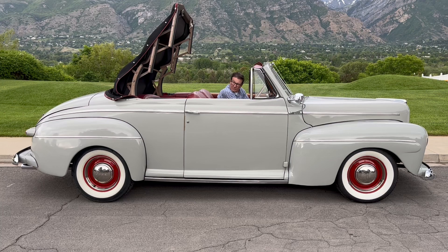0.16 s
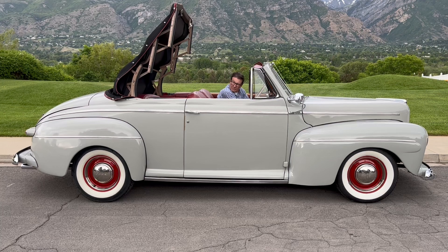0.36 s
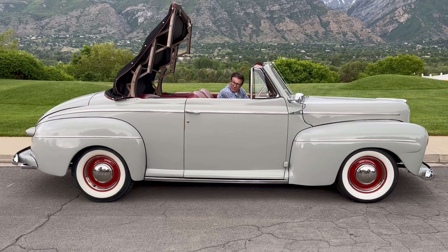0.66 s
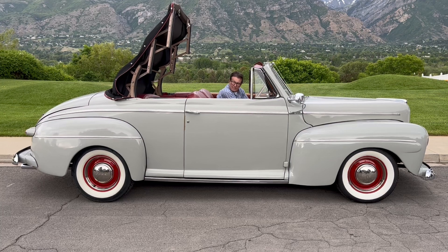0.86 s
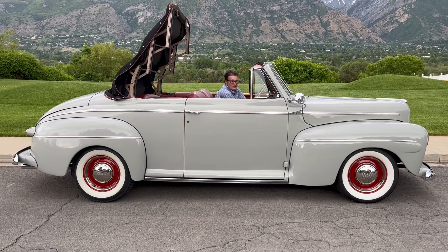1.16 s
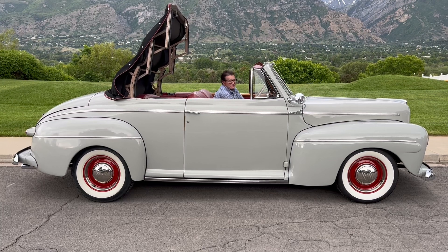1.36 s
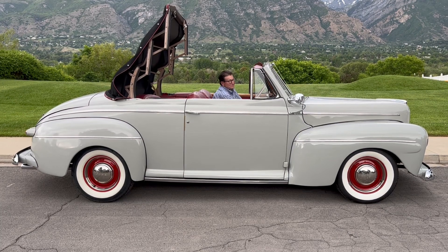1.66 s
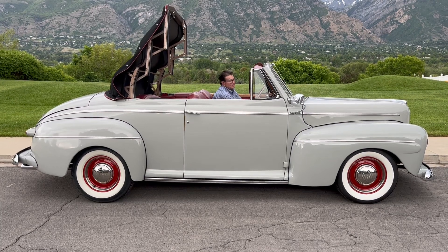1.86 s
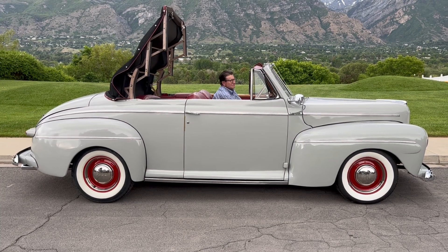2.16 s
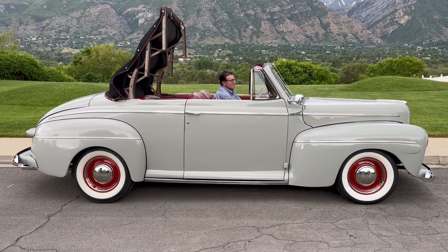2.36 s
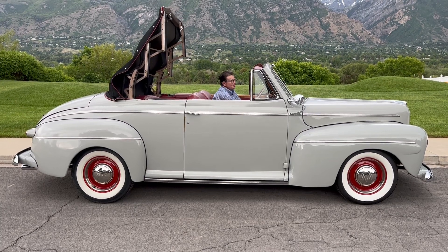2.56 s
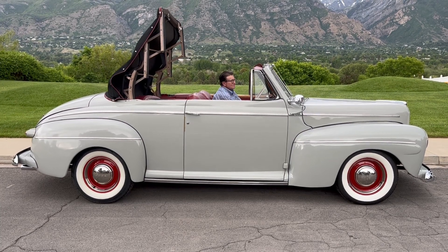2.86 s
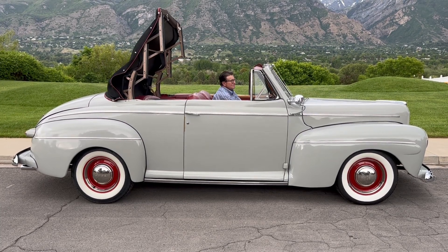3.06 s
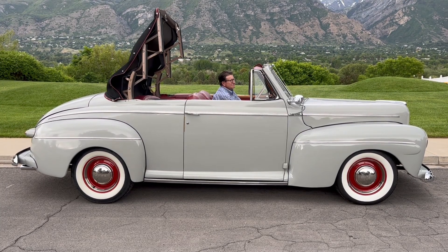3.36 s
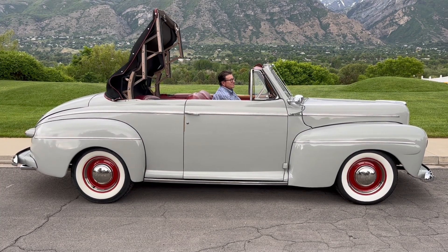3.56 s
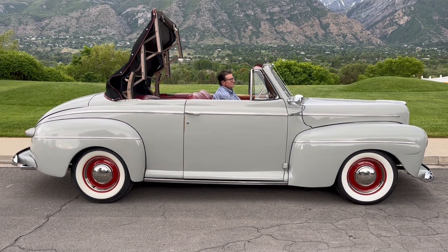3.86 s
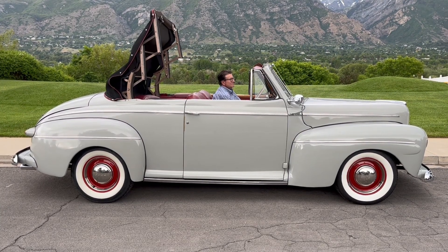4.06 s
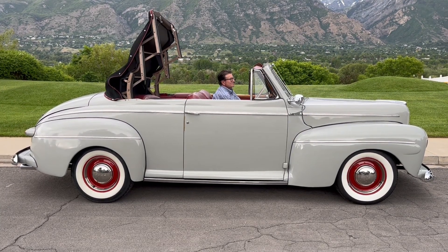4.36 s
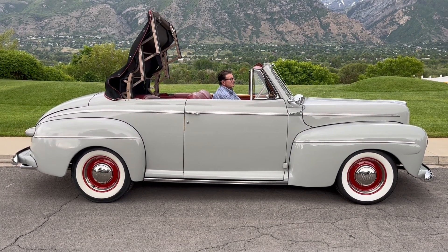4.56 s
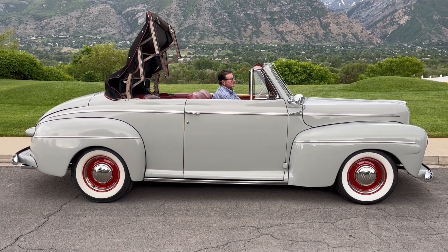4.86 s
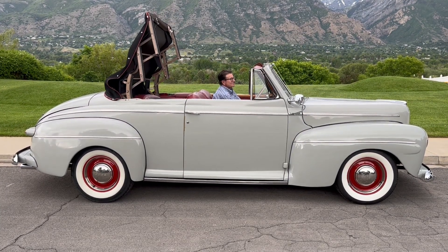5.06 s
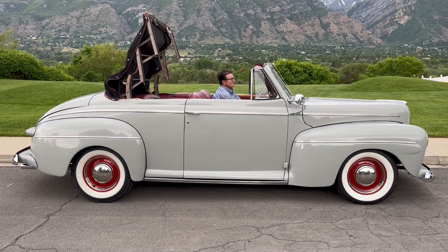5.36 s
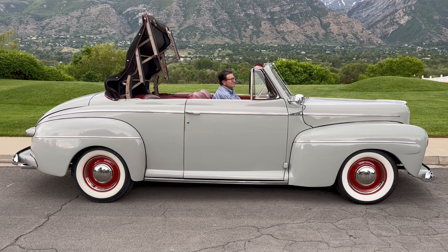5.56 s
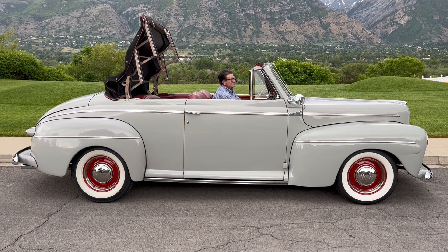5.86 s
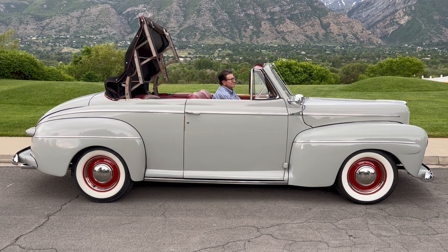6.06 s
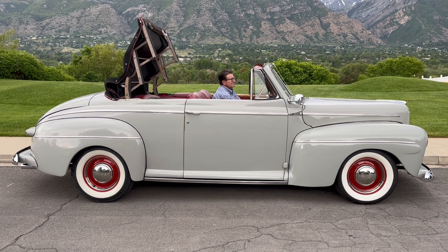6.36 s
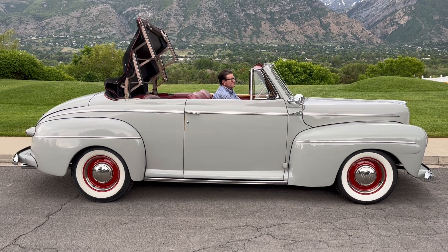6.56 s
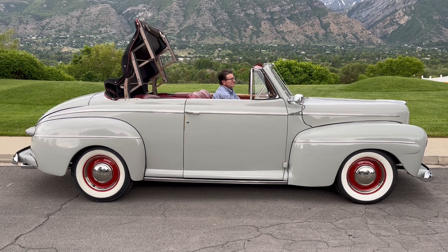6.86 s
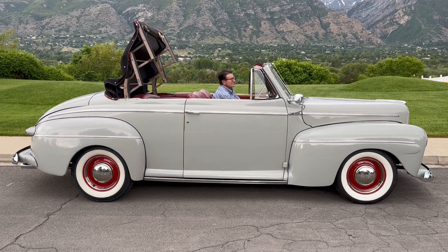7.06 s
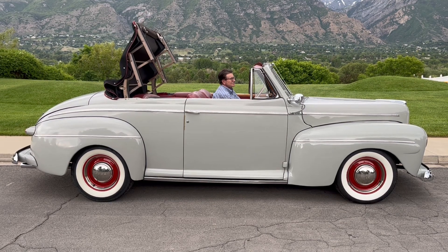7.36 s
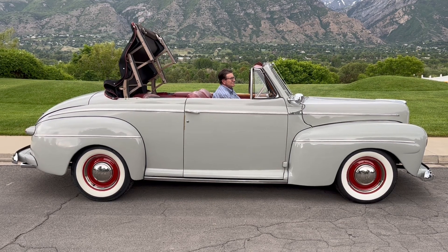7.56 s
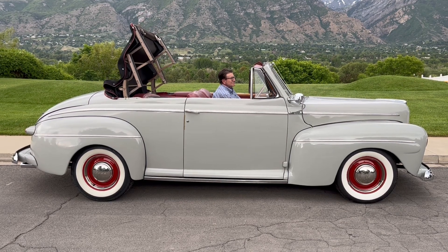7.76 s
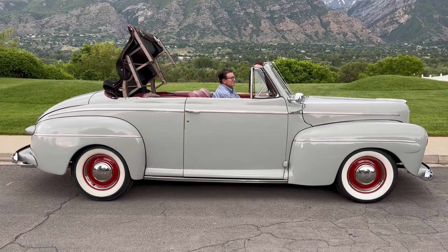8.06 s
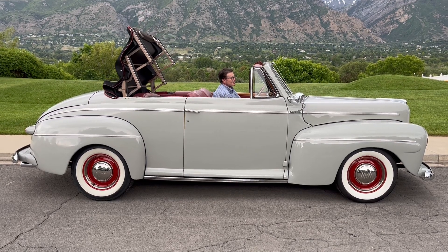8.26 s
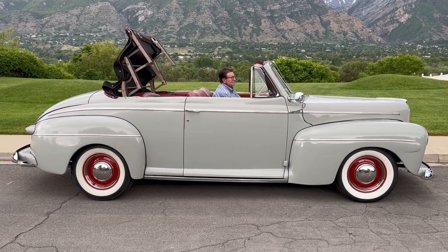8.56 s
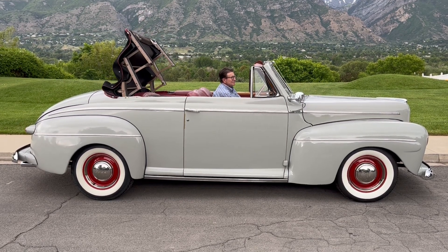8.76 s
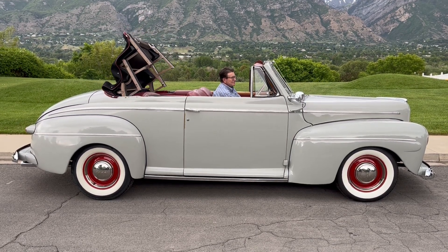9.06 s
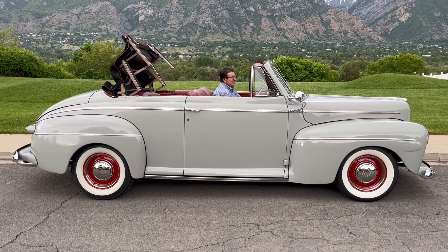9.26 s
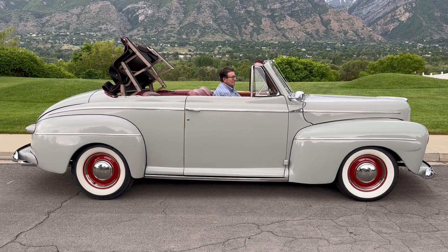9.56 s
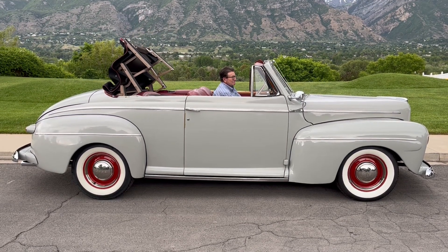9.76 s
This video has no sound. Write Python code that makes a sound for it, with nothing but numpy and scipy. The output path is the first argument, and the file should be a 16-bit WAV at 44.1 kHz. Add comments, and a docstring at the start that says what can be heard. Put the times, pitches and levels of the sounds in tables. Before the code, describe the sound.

A vintage convertible idles outdoors, its tail pipe giving deep, uneven, fluttering puffs over a droning silencer and soft gas rush. An electric roof pump whines throughout, slowly rising, then stepping slightly higher and quieter near the middle. Fan noise, valve ticks and raspy steel chafing accompany it; the folding frame rubs, scrapes and occasionally creaks. Stereo microphones stand side-on in open air.

```python
"""An old V8 convertible idles at the roadside while its electric pump lowers the folding roof, for 9.9 s.
Throughout, eight uneven puffs a cycle ring the tail pipe; the silencer drones and shaped noise makes the gas,
fan and frame rub; belts whine as tones, and ticks, squeak and rasp are noise bursts tied to the cycle.
The frame scrapes from 2.1 s and a hinge creaks from 3.1 s; the idle stumbles near 3.2, 5.8, 7.6 and 8.4 s.
The pump, tones on shaft orders, rises slowly in pitch, jumps up and drops in level near 5 s, then fades."""
import sys
import numpy as np
from scipy import signal
from scipy.fft import rfft, irfft, next_fast_len
from scipy.io import wavfile
from scipy.ndimage import map_coordinates

SR = 44100
rng = np.random.default_rng(int(sys.argv[2]) if len(sys.argv) > 2 else 0)


def pcm_store(signal):
    """Save signal as 16-bit PCM."""
    levels = np.round(np.clip(np.atleast_2d(signal), -1, 1) * 32767)
    wavfile.write(sys.argv[1], SR, levels.astype(np.int16).T)


N = 437472
TIME_S = np.arange(N) / SR

# Levels are relative wherever a function sets the layer's own level.
# outdoor rumble: (frequency [Hz], density [dB/Hz])
AIR = [(15, -28), (28, -15), (45, 0), (90, -2), (200, -17), (600, -45), (2000, -90)]
# stereo likeness of left and right: (frequency [Hz], correlation [-1 to 1])
STEREO_LIKENESS = [(100, .95), (600, .88), (1100, .4), (1500, .4), (2300, .87), (3300, .65), (4300, .25),
                   (6500, .2), (8400, .65), (10000, .7), (12500, .55), (14000, .4)]
# stereo balance: (frequency [Hz], left minus right [dB])
STEREO_LEAN = [(80, 0), (160, 1), (300, 1.7), (700, 0), (1400, -1), (2000, 1.5), (2700, .5), (4000, 3.3),
               (6000, 1.5), (8000, 0)]
# phase by which the left microphone leads: (frequency [Hz], phase [rad])
LEFT_LEAD = [(100, 0), (280, .3), (780, .25), (1900, -.1), (3270, .4), (4300, 0), (6400, -.8), (8500, -3.1),
             (11100, -6), (12600, -6.5), (14300, -8)]
# hinge creaks: (time [s], level [dB])
CREAKS = [(3.105, -49), (4.982, -48), (8.86, -52), (8.965, -50)]
# ring of the hinge: (frequency [Hz], density [dB/Hz])
HINGE_RING = [(3000, -35), (3900, -8), (4300, 0), (4600, -8), (5500, -30), (9000, -55)]
# short scrapes where the folding frame catches: (time [s], level [dB])
SCRAPES = [(2.098, -47), (2.144, -42), (3.492, -49), (3.958, -47), (5.755, -48), (7.81, -49),
           (8.705, -47.5)]
# ring of rubbed steel in the roof frame: (frequency [Hz], density [dB/Hz])
FRAME_RING = [(1200, -22), (2100, -6), (2550, 0), (2900, -3), (3400, -12), (4400, -15), (7000, -30),
              (12000, -60)]
# the rocking engine chafes a loose part: (place in engine cycle [0-1], level [dB])
CHAFES = [(.3, -4), (.6, -4), (.955, 0)]
# hardest bites of the loose part: (time [s], level [dB])
BITES = [(.13, -43), (.265, -47), (.853, -48.5), (1.003, -48), (3.301, -48), (4.751, -48), (5.025, -48),
         (6.036, -47), (6.32, -47), (6.608, -42.3), (7.028, -48), (7.192, -47), (8.468, -45.5),
         (9.002, -47), (9.342, -47), (9.627, -46.5), (9.772, -48)]
# ring of the loose part: (frequency [Hz], density [dB/Hz])
RASP_RING = [(1200, -26), (2000, -8), (2350, -1), (2650, 0), (2950, -5), (3400, -12), (4400, -17),
             (7000, -30), (12000, -60)]
# fan and engine bay: (frequency [Hz], density [dB/Hz])
FAN = [(100, -10), (500, 2), (690, 5), (820, 0), (900, 4.5), (945, 0), (1080, 5.5), (1400, 2), (1750, -.6),
       (2100, -.3), (2650, -3.2), (3050, -7.1), (3450, -10.3), (3700, -9.2), (3850, -5.8), (4050, -8.6),
       (4450, -6.8), (5300, -10.8), (6000, -10), (7400, -13.8), (8400, -19), (10200, -13.8), (12500, -16),
       (14500, -21.5)]
# valve gear ticks: (place in engine cycle [0-1], level [dB])
TAPPETS = [(.01, -7), (.24, -3), (.39, -7), (.53, -5), (.61, 0), (.72, -6), (.88, -5)]
# tappet click: (frequency [Hz], density [dB/Hz])
CLICK = [(500, -12), (1200, -2), (4400, 0), (6500, -6), (8400, -16), (10000, -11), (14000, -22)]
# a dry spot rubs twice per camshaft turn: (place in engine cycle [0-1], level [dB])
RUBS = [(.195, -1.5), (.325, 0)]
# course of the valve gear squeak: (time [s], level [dB])
SQUEAK_LEVEL = [(0, -63), (2, -60.5), (4.5, -59), (6.2, -67), (7.3, -61.5), (8.2, -68), (9.92, -66)]
# narrow ring of the squeak: (frequency [Hz], density [dB/Hz])
SQUEAK_RING = [(11800, -35), (12250, -16), (12380, -4), (12450, -8), (12550, 0), (12680, -15), (13200, -35)]
# steady belt drive whines: (frequency [Hz], level [dB])
BELT_WHINES = [(431, -60), (490, -58), (583, -63), (868, -59), (985, -64), (1026, -65), (1085, -67),
               (1815, -70), (1974, -69), (2207, -68), (3850, -72), (5010, -69.5)]
# roof pump, tenth shaft order: (time [s], frequency [Hz], level [dB])
PUMP_COURSE = [(0, 721, -39.7), (1.1, 722.3, -39.5), (2.3, 725.3, -38.3), (3.5, 727.3, -38.4),
               (4.9, 728.2, -39.7), (5.06, 733, -42.5), (5.7, 731.2, -42), (6.5, 732.5, -42.8),
               (7, 734, -45), (8.6, 736.5, -45.7), (8.9, 733, -44), (9.1, 736.8, -46), (9.92, 734, -45.2)]
# pump partials: (multiple of shaft speed [-], level [dB], share of the fading followed [0-1])
PUMP_ORDERS = [(6, -18, 1), (8, -17, .5), (9, -17.5, 0), (10, -.5, 1), (20, -27, 1), (30, -26, .4)]
# silencer drone through one cycle: (place in engine cycle [0-1], frequency [Hz], level [dB])
DRONE_ARCH = [(.05, 222, -3), (.24, 250, -1), (.34, 298, -1), (.44, 333, 1.2), (.56, 341, -1.3),
              (.75, 333, -1.7), (.87, 295, -7), (.97, 250, -13)]
# idle speed: (time [s], firing rate [1/s])
IDLE_SPEED = [(0.0, 55.23), (1.23, 55.51), (1.89, 56.39), (2.5, 55.35), (4.68, 55.65), (5.1, 54.93),
              (5.73, 55.35), (5.91, 56.13), (7.33, 55.34), (7.47, 56.9), (7.96, 54.71), (8.5, 56.58),
              (9.02, 55.04), (9.92, 56.05)]
# cylinders in firing order: (puff offset from even spacing [s], size [dB])
CYLINDERS = [(0.0063, 5.1), (0.004, -0.5), (0.006, 1.9), (0.0053, 3), (0.0011, -6), (0.0059, 3.1),
             (-0.003, -8.1), (0.0094, 1.4)]
# stumbles, firing harder and less evenly: (time [s], 1/e half length [s], swell [dB])
STUMBLES = [(3.15, .2, .1), (5.75, .33, .3), (7.6, .2, .1), (8.4, .3, .1)]
# late firings that pop in the pipe, out of step: (time [s], size [dB])
POPS = [(.58, -6), (3.088, -5), (5.822, -2), (6.23, -6), (7.561, 0), (7.99, -4), (8.213, -3), (8.326, -4)]
# silencer and tail pipe resonance: (frequency [Hz], gain [dB])
PIPE = [(22, -38), (40, -12.9), (55, 5.4), (68, 2.2), (80, 5.6), (92, 9.6), (122, -13.5), (135, -1.6),
        (146, 2.6), (158, -16), (200, -23), (220, -13), (245, -19.5), (310, -30), (600, -55), (2000, -110)]
# knocks that make the silencer shell throb, strongest before mid-cycle:
# (place in engine cycle [0-1], level [dB])
SHELL_KNOCKS = [(.19, -3), (.335, -2.5), (.42, 0), (.545, -5), (.65, -5), (.775, -9)]
# ring of the silencer shell: (frequency [Hz], gain [dB])
SHELL = [(150, -30), (225, 0), (280, 0), (305, -2), (337, -3), (365, -7), (405, -16), (700, -45),
         (2000, -110)]
# gas rushing out of the pipe: (frequency [Hz], density [dB/Hz])
GAS = [(150, -33), (250, -8.5), (370, 1.5), (405, -3.5), (433, 1), (462, -2.5), (490, 4.5), (545, -5),
       (585, 0), (615, -3), (700, -0.5), (950, -7), (1500, -55), (5000, -80)]
# low rumble of the exhaust, steady and swelling at the stumbles: (frequency [Hz], density [dB/Hz])
RUMBLE = [(35, -14), (50, 0), (85, 0), (135, -7), (175, -9), (270, -13), (450, -38), (1500, -80)]

# spread of puff sizes: smooth running, and what a stumble adds
SCATTER_DB, STUMBLE_SCATTER_DB = .45, .5
GAS_GROWTH_POWER = .15  # of the puff size
TOP_HZ = 14600


def amp(db):
    """Decibels to gain."""
    return 10 ** (np.asarray(db) / 20)


def unit(x):
    """Scale to rms 1."""
    return x / np.sqrt(np.mean(x ** 2) + 1e-20)


def along(points, hz):
    """Read (frequency [Hz], value) points on a log axis."""
    point_hz, value = np.transpose(points)
    return np.interp(np.log(hz + 1), np.log(point_hz + 1), value)


def curves(rows):
    """One value per sample for each column after the time."""
    s, *columns = np.transpose(rows)
    return [np.interp(TIME_S, s, column) for column in columns]


def wobble(rate_hz):
    """Smooth random curve with rate_hz knots a second."""
    knots = rng.standard_normal(int(N * rate_hz / SR) + 4)
    return map_coordinates(knots, [TIME_S * rate_hz])


def filtered(x, response):
    """Multiply the spectrum of x by a response of frequency."""
    size = next_fast_len(N + SR // 2)
    hz = np.fft.rfftfreq(size, 1 / SR)
    return irfft(rfft(x, size) * response(hz), size)[..., :N]


def ring(points, size=32768):
    """Minimum-phase impulse response of a body with this spectrum."""
    gain = amp(along(points, np.fft.rfftfreq(size, 1 / SR)))
    cepstrum = irfft(np.log(gain))
    # fold the cepstrum to make the response causal
    cepstrum[1:size // 2] *= 2
    cepstrum[size // 2 + 1:] = 0
    return irfft(np.exp(rfft(cepstrum)))


def rush(spectrum):
    """Coloured stereo noise of rms 1; the mid-side mix sets the left-right likeness."""
    def mid_side_gain(hz):
        turn_rad = np.arccos(np.clip(along(STEREO_LIKENESS, hz), -1, 1)) / 2
        return amp(along(spectrum, hz)) * [np.cos(turn_rad), np.sin(turn_rad)]

    mid, side = filtered(rng.standard_normal((2, N)), mid_side_gain)
    return unit(np.array([mid + side, mid - side]))


def strikes(times_s, sizes):
    """Impulses at the given times."""
    inside = (times_s >= 0) & (times_s < N / SR)
    return np.bincount((times_s[inside] * SR).astype(int), sizes[inside], N)


def bursts(impulses, rise_s):
    """Each impulse becomes a swell that peaks after rise_s and dies away."""
    u = TIME_S[:SR // 2] / rise_s
    return signal.fftconvolve(impulses, u * np.exp(1 - u))[:N]


def each_cycle(cycle, places, scatter_db):
    """Impulses at the same places of every engine cycle, with scattered strength."""
    place, db = np.transpose(places)
    turns = np.arange(int(cycle[-1]) + 1)[:, None] + place
    scatter = np.clip(rng.standard_normal(turns.shape), -2, 2)
    sizes = amp(db + scatter_db * scatter)
    times_s = np.interp(turns, cycle, TIME_S, right=-1)  # -1: beyond the end, dropped
    return strikes(times_s.ravel(), sizes.ravel())


def tone(hz):
    """Sine of rms 1 on a pitch curve."""
    return np.sqrt(2) * np.sin(2 * np.pi * (np.cumsum(hz) / SR + rng.random()))


def outdoor_rumble(air_db=-32):
    """Steady low-frequency noise of the open air."""
    return amp(air_db) * rush(AIR)


def surroundings(x, t60_s=.25):
    """Road, kerb and bodywork scatter a brief decaying answer, opposite in sign at the two ears."""
    t_s = TIME_S[:SR // 3]
    tail = rng.standard_normal(len(t_s)) * amp(-60 * t_s / t60_s)
    answer = signal.fftconvolve(x.mean(0), tail / np.linalg.norm(tail))[:N]
    return np.array([answer, -answer])


def roof_hinges(rise_s=.008):
    """A dry hinge gives a tiny creak now and then: bursts of narrow noise."""
    s, db = np.transpose(CREAKS)
    return bursts(strikes(s, amp(db)), rise_s) * rush(HINGE_RING)


def roof_frame(creep_db=-55.5, uneven_db=2.6, rise_s=.011):
    """The joints rub unevenly all the while the bows fold, and now and then catch."""
    s, db = np.transpose(SCRAPES)
    creep = amp(creep_db + uneven_db * wobble(24))
    catches = bursts(strikes(s, amp(db)), rise_s)
    return np.hypot(creep, catches) * rush(FRAME_RING)


def loose_part(cycle, rasp_db=-51, grain_db=2.2):
    """A short, grainy steel rasp as the engine rocks; on some cycles it bites harder."""
    s, db = np.transpose(BITES)
    chafing = amp(rasp_db) * bursts(each_cycle(cycle, CHAFES, scatter_db=2), rise_s=.007)
    biting = bursts(strikes(s, amp(db)), rise_s=.013)
    grain = unit(amp(grain_db * wobble(300)))
    return np.hypot(chafing, biting) * grain * rush(RASP_RING)


def bonnet(x, share=.3, t60_s=.06):
    """Quick echoes under the bonnet give the rush a ragged, hollow colour."""
    t_s = TIME_S[:SR // 25]
    tail = rng.standard_normal(len(t_s)) * amp(-60 * t_s / t60_s)
    echoes = signal.fftconvolve(x, tail[None] / np.linalg.norm(tail), axes=1)[:, :N]
    return unit(x + share * echoes)


def belt_whine(hz, db):
    """A belt drive tone, slightly unsteady in level and pitch."""
    level_db = db + 1.8 * wobble(6) + 1.2 * wobble(1.5)
    return amp(level_db) * tone(hz * (1 + .0008 * wobble(25)))


def engine_bay(cycle, fan_db=-44, tappet_db=-57.7):
    """Fan rush and belt whines, with ticks and a squeak tied to the camshaft."""
    fan_level_db = fan_db + .3 * wobble(7) + .45 * wobble(70)
    fan = amp(fan_level_db) * bonnet(rush(FAN))
    ticks = unit(bursts(each_cycle(cycle, TAPPETS, scatter_db=1.5), rise_s=.0025))
    ticks = amp(tappet_db) * ticks * rush(CLICK)
    rubs = bursts(each_cycle(cycle, RUBS, scatter_db=2.3), rise_s=.006)
    squeak = amp(curves(SQUEAK_LEVEL)[0]) * rubs * rush(SQUEAK_RING)
    whines = sum(belt_whine(hz, db) for hz, db in BELT_WHINES)
    return fan + ticks + squeak + whines


def roof_pump(pump_db=.8, flutter=.001, slack_flutter=.0015, slack_rough_db=1.1):
    """The pump sings on its shaft orders, above all the tenth, which fades and roughens as the load eases."""
    tenth_hz, db = curves(PUMP_COURSE)
    eased_db = db.max() - db
    slack = eased_db / np.ptp(db)
    shaft_hz = tenth_hz / 10 * (1 + flutter * wobble(22) + slack_flutter * slack * wobble(50))
    orders = 0
    for order, level_db, follows in PUMP_ORDERS:
        uneven_db = .8 if order == 10 else 2.5
        order_db = level_db - follows * eased_db + uneven_db * wobble(13)
        orders = orders + amp(order_db) * tone(round(order) * shaft_hz)
    return amp(db.max() + pump_db + slack_rough_db * slack * wobble(40)) * orders


def shell_drone(cycle, drone_db=-38.6, rough_db=1.8, jitter_rad=.45, drift_cycles=.018):
    """The silencer's drone starts afresh in every engine cycle, arches up in pitch and falls back."""
    place, hz, db = np.transpose(DRONE_ARCH)
    course = cycle + drift_cycles * wobble(7)  # no two arches are alike
    turns = np.cumsum(np.interp(course, place, hz, period=1)) / SR
    turns = turns - np.interp(np.floor(cycle), cycle, turns)  # phase restarts each cycle
    level_db = np.interp(course, place, db, period=1) + rough_db * wobble(45)
    fade = np.minimum(1, np.abs(np.sin(np.pi * cycle)) / .2) ** 2  # silent at the restart
    drone = np.sin(2 * np.pi * turns + jitter_rad * wobble(25))
    return amp(drone_db) * unit(fade * amp(level_db) * drone)


def exhaust(cycle, pipe_db=-15.4, knock_db=-44.7, gas_db=-44, slip_s_per_db=.0005, rumble_db=-29.5,
            steady_share=.42):
    """Puffs ring the pipe and push out turbulent gas; knocks at set places in the cycle make the shell throb."""
    s, half_length_s, swell_db = np.transpose(STUMBLES)
    stumbling = np.exp(-((TIME_S[:, None] - s) / half_length_s) ** 2)
    stumble = stumbling.sum(1)
    scatter_db = SCATTER_DB + STUMBLE_SCATTER_DB * stumble

    delay_s, db = np.transpose(CYLINDERS)
    firing = np.arange(int(cycle[-1] * len(db)))
    which = firing % len(db)
    times_s = np.interp(firing / len(db), cycle, TIME_S) + delay_s[which]
    spread_db = np.interp(times_s, TIME_S, scatter_db)
    late_db, strong_db = rng.standard_normal((len(firing), 2)).T * spread_db
    # an uneven firing is also a little early or late
    puffs = strikes(times_s + slip_s_per_db * late_db, amp(db[which] + strong_db))
    pop_s, pop_db = np.transpose(POPS)
    pops = strikes(pop_s, amp(pop_db))

    burble = signal.fftconvolve(puffs + pops, ring(PIPE))[:N]
    burble = amp(pipe_db + stumbling @ swell_db) * unit(burble)
    throb = signal.fftconvolve(each_cycle(cycle, SHELL_KNOCKS, scatter_db=1.1), ring(SHELL))[:N]
    throb = amp(knock_db) * unit(throb)
    gas = amp(gas_db) * unit(bursts(puffs ** GAS_GROWTH_POWER, rise_s=.006)) * rush(GAS)
    rumble = amp(rumble_db) * (steady_share + stumble) * rush(RUMBLE)
    return burble + throb + gas + rumble


def scene(scatter_db=-20):
    """The car stands side-on in open air, over a faint outdoor rumble."""
    cycle = np.cumsum(curves(IDLE_SPEED)[0]) / SR / len(CYLINDERS)  # engine cycles run so far
    roof = roof_hinges() + roof_frame() + roof_pump()
    engine = loose_part(cycle) + engine_bay(cycle) + shell_drone(cycle) + exhaust(cycle)
    car = roof + engine
    heard = outdoor_rumble() + amp(scatter_db) * surroundings(car) + car
    sides = np.array([[.5], [-.5]])  # left, right

    def microphones(hz):
        return amp(sides * along(STEREO_LEAN, hz)) * np.exp(1j * sides * along(LEFT_LEAD, hz))

    return filtered(heard, microphones)


def record(dry):
    """The recorder keeps nothing above its band limit."""
    return filtered(dry, lambda hz: hz < TOP_HZ)


dry = scene()
out = record(dry)
pcm_store(out)
```